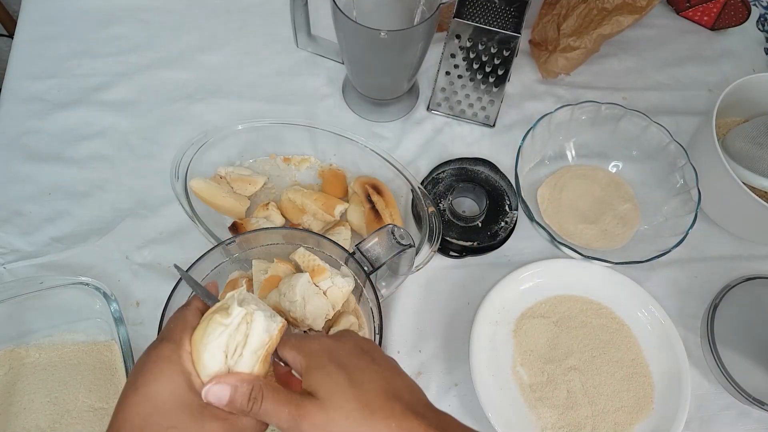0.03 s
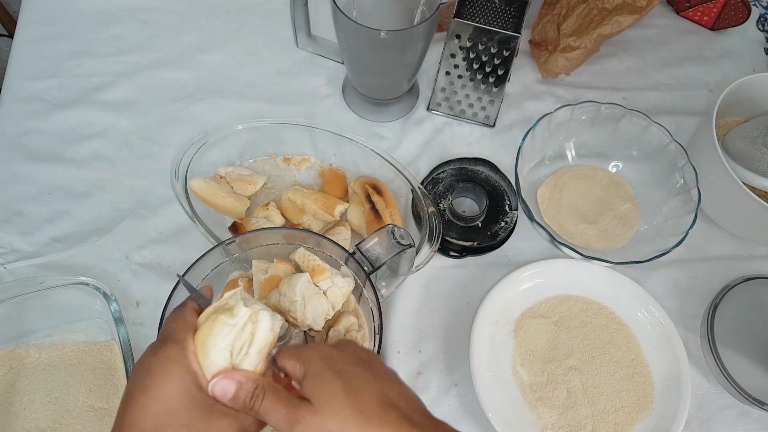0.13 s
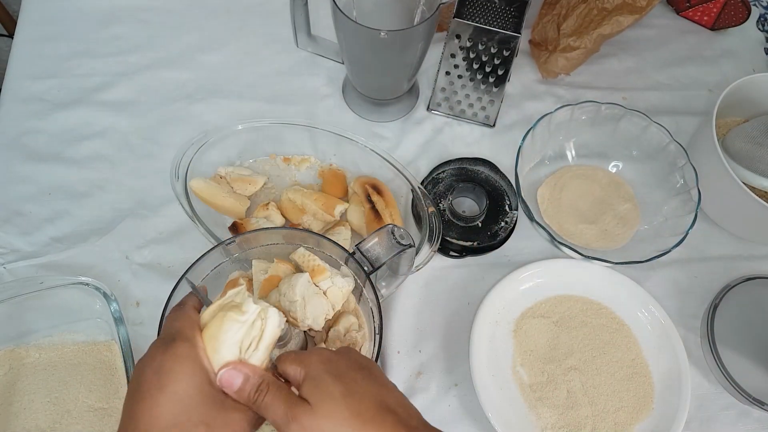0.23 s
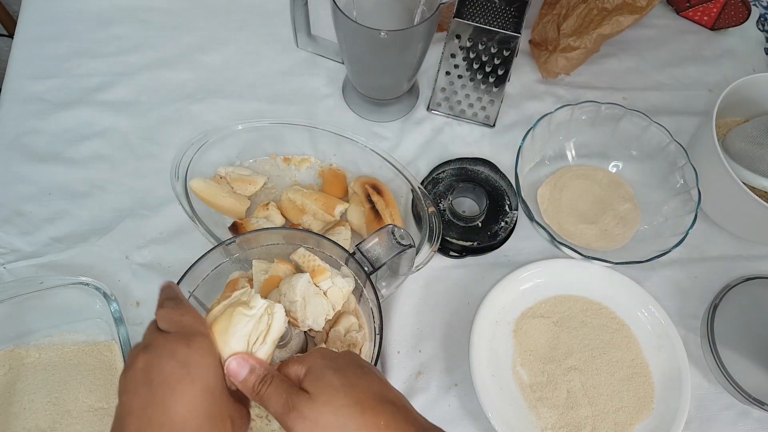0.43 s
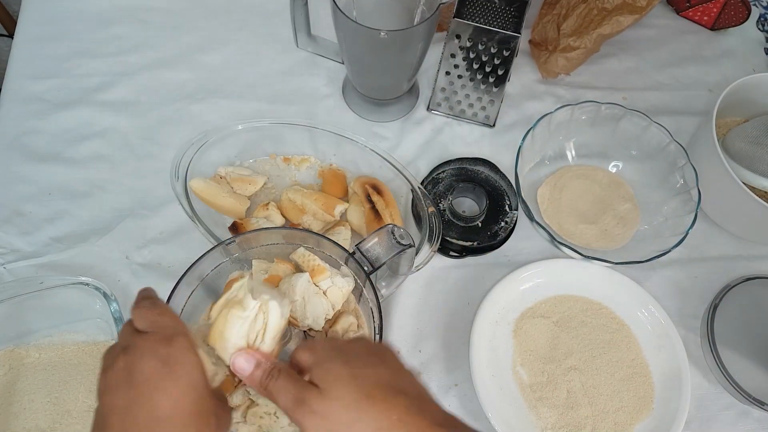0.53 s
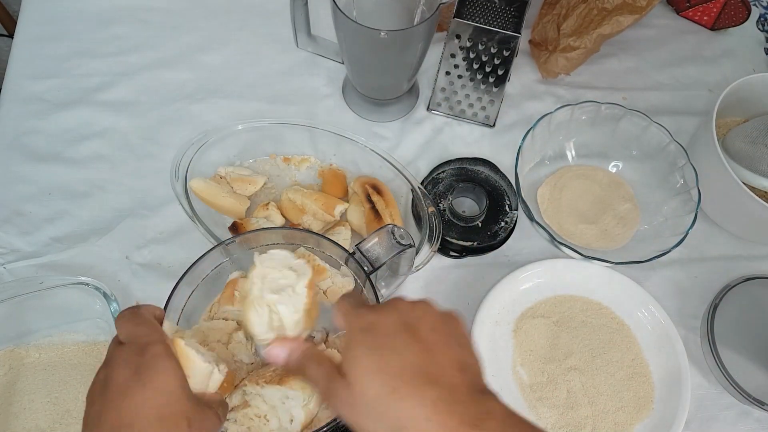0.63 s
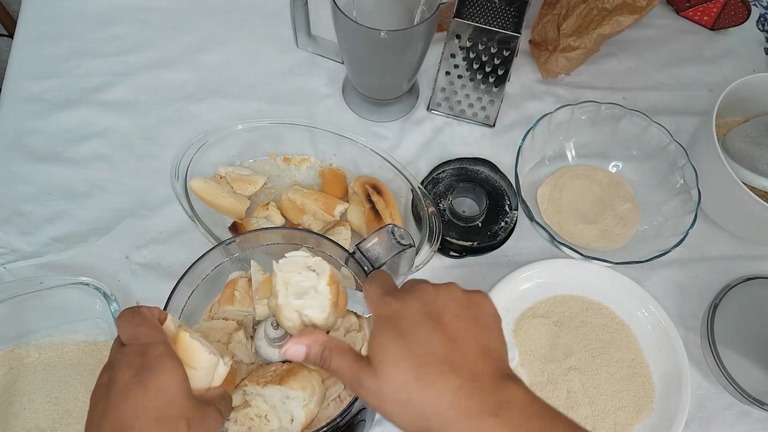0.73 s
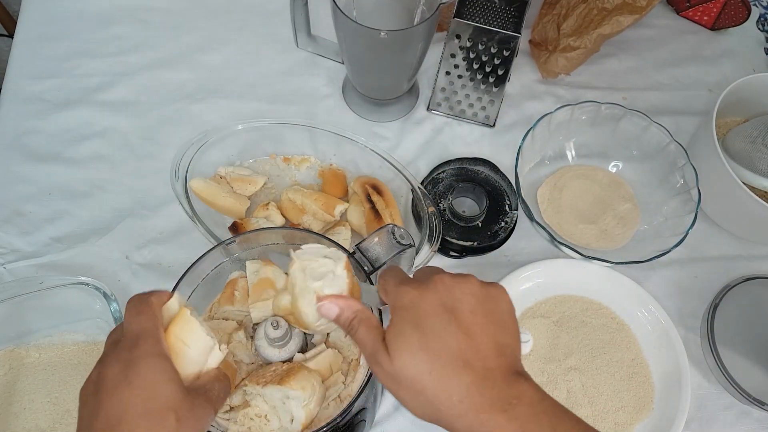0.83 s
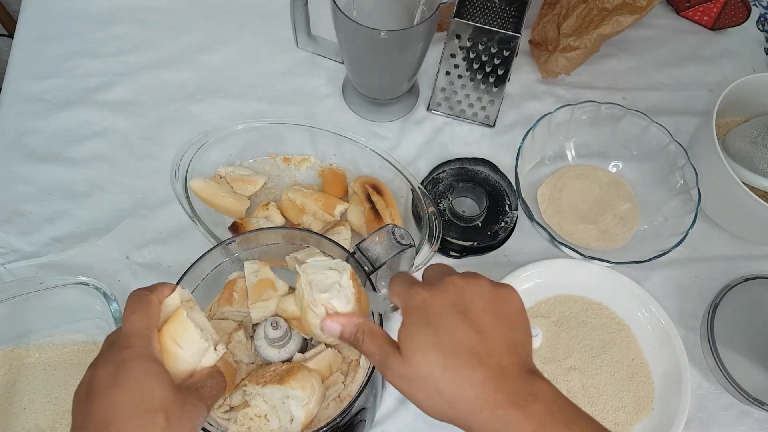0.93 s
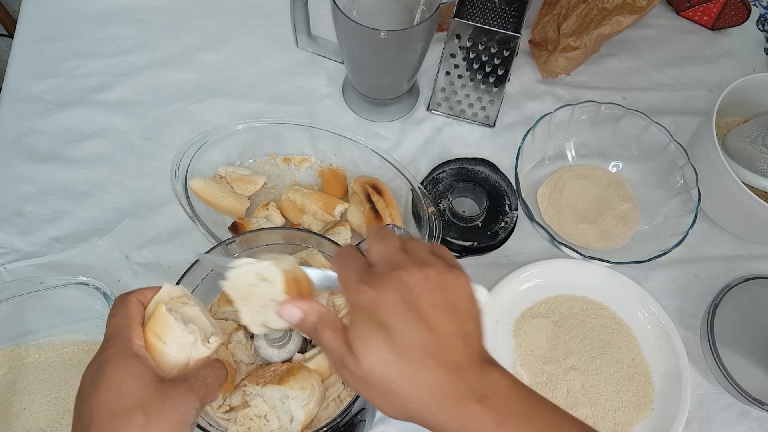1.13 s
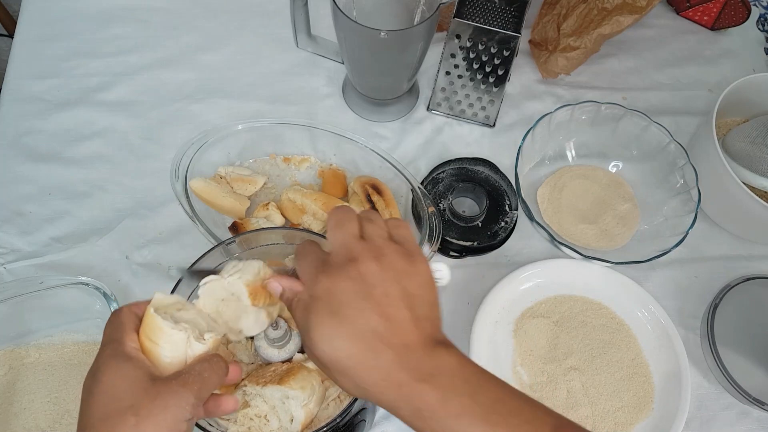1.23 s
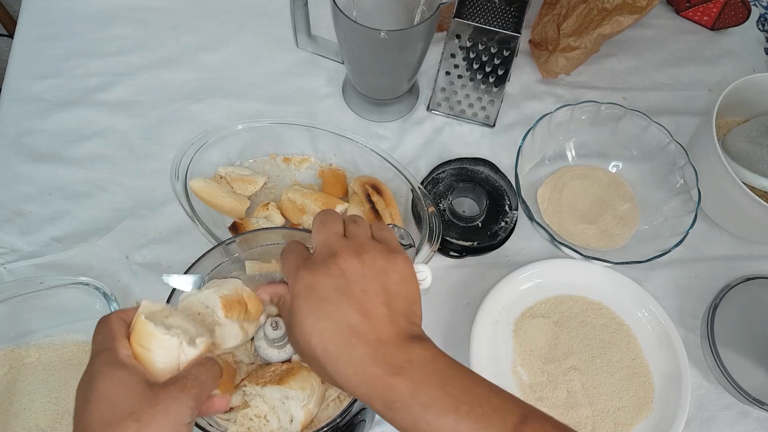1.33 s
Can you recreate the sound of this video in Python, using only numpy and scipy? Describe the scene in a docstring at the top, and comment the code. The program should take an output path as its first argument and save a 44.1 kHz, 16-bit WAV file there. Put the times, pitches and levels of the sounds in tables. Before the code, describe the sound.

Close up in a kitchen with a faint hum, bread crust crunches and snaps as it is cut and broken by hand. It parts with a hollow knock, then the pieces rustle softly and bump a plastic bowl.

```python
"""Breaking a crusty roll

A bread roll is cut and snapped in two by hand over a plastic bowl, close up in a small kitchen.
The crust crackles under the blade, gives way in sharp snaps that shed flakes, and parts with a hollow
knock. Hands rub the crumb, shift the pieces and bump the bowl, over room air and a faint hum."""
import sys
import numpy as np
from scipy import signal
from scipy.fft import rfft, irfft
from scipy.io import wavfile

SR = 44100
rng = np.random.default_rng(int(sys.argv[2]) if len(sys.argv) > 2 else 0)


def materialize(psi):
    """Save the field psi as 16-bit PCM at rate SR to the path in sys.argv[1].

    A 1-D psi becomes a single channel; in a 2-D psi each row is a channel.
    """
    bounded = np.clip(np.atleast_2d(psi).T, -1, 1)
    quanta = np.round(bounded * 32767).astype(np.int16)
    wavfile.write(sys.argv[1], SR, quanta)


N = 61739
BODY_HZ, BODY_OCTAVES, TREBLE_HZ = 1010, 0.68, 6000  # tone controls: mid bell and treble shelf


def undb(db):
    """Decibels to gain."""
    return 10 ** (np.asarray(db) / 20)


def level(x, db):
    """Scale to an rms level."""
    return x * undb(db) / np.sqrt(np.mean(x ** 2) + 1e-24)


def pulse_height(db):
    """Height of a one-sample pulse with this level over a millisecond."""
    return undb(db) * np.sqrt(SR / 1000)


def fade(t, t60):
    """Exponential decay, 60 dB down after t60 seconds."""
    return np.exp(-np.log(1000) * t / t60)


def ride(t, points):
    """A fader ride: gain gliding through (time, level) points."""
    return undb(np.interp(t, *np.array(points).T))


def through(x, response):
    """Filter a sound, keeping its length."""
    return signal.fftconvolve(x, response)[:len(x)]


def colour(points, body_db=0, treble_db=0, shelf_hz=TREBLE_HZ, size=2048):
    """Unit-energy response of an EQ curve with a mid bell and a high shelf."""
    hz = np.maximum(np.fft.rfftfreq(size, 1 / SR), 1)
    point_hz, point_db = np.array(points, float).T
    db = np.interp(np.log(hz), np.log(point_hz), point_db)
    db += treble_db / (1 + (shelf_hz / hz) ** 4)
    db += body_db * np.exp(-(np.log2(hz / BODY_HZ) / BODY_OCTAVES) ** 2)
    cepstrum = irfft(np.log(undb(db)))
    cepstrum[1:size // 2] *= 2  # minimum phase keeps the attack sharp
    cepstrum[size // 2 + 1:] = 0
    response = irfft(np.exp(rfft(cepstrum)))
    return response / np.linalg.norm(response)


def diffuse(size=N, alike_hz=450):
    """Noise from all around: alike left and right in the bass only."""
    mid, side = rfft(rng.standard_normal((2, size)))
    alike = .9 / (1 + (np.fft.rfftfreq(size, 1 / SR) / alike_hz) ** 2)
    pair = mid * np.sqrt(1 + alike) + np.array([[1], [-1]]) * side * np.sqrt(1 - alike)
    return irfft(pair, size) / np.sqrt(2)


def reflections(size, t60, db, delay_s):
    """A dense stereo tail that dies away."""
    t = np.arange(size) / SR
    tail = fade(t, t60) * (t > delay_s)
    return diffuse(size) * tail * undb(db) / np.linalg.norm(tail)


# Bright EQ of the close reflections (frequency [Hz], relative level [dB])
EARLY_EQ = [(60, -2), (300, -4.5), (1000, -6.5), (3000, -0.5), (7000, 2.5), (16000, 1)]


def place(x, size=4096, right_lag_s=.000062, pan_db=0.8):
    """Set a sound just left of centre; every spot on the bread has its own quick reflections."""
    lag = np.exp(-2j * np.pi * np.fft.rfftfreq(size, 1 / SR) * np.array([[0], [right_lag_s]]))
    pan = undb(np.array([[pan_db], [-pan_db]]) / 2)
    direct = irfft(lag) * pan * (np.arange(size) < size // 2)
    echo = reflections(size, t60=0.0025, db=-4.5, delay_s=0)  # hands and bowl rim
    echo += reflections(size, t60=0.072, db=-4.5, delay_s=0.0018)  # table and bowl
    tint = colour(EARLY_EQ)
    return np.array([signal.fftconvolve(x, d + through(e, tint))[:N] for d, e in zip(direct, echo)])


def add(out, start_s, x):
    """Place a sound in stereo and mix it in on cue."""
    i = int(start_s * SR)
    pair = place(x)[:, :N - i]
    out[:, i:i + pair.shape[1]] += pair


def grains(per_s=2000, spread_db=3):
    """Tiny clicks at random moments, mostly weak, a few strong."""
    heights = undb(spread_db * np.minimum(rng.exponential(size=N), np.pi)) * rng.choice([-1, 1], N)
    return level(heights * (rng.random(N) < per_s / SR), 0)


def smear(x, low_hz=2040, high_hz=13000, stages=4):
    """Travel through uneven crust spreads a click over a fraction of a millisecond."""
    for share in (np.arange(stages) + rng.random(stages)) / stages:
        hz = low_hz * (high_hz / low_hz) ** share
        feedback = signal.iirpeak(hz, Q=1, fs=SR)[1]
        x = signal.lfilter(feedback[::-1], feedback, x)  # all-pass
    return x


# Bass-heavy EQ of the room air (frequency [Hz], relative level [dB])
AIR_EQ = [(20, -27.5), (35, -14.5), (55, -4.5), (80, -10.5), (115, -3), (160, -6.5), (260, -5.5),
          (450, -18.5), (900, -19.5), (2500, -27.5), (7000, -39), (16000, -34)]
# Steady appliance tones (frequency [Hz], rms level [dB])
APPLIANCE_TONES = [(236, -74.5), (269, -69.5)]
# Swells of the low hum (time [s], rms level [dB])
HUM_RIDE = [(0, -60), (.1, -67), (.16, -80), (.24, -61), (.36, -63), (.44, -75), (.55, -60), (.66, -61.5),
            (.73, -70), (.81, -61.5), (.92, -61.5), (1.0, -69), (1.15, -63), (1.29, -72.5), (1.38, -65)]


def room_tone(t, air_db=-60, hum_hz=57.5):
    """The bed: room air, faint appliance tones and a low hum that swells and dips."""
    air = level(np.array([through(x, colour(AIR_EQ)) for x in diffuse()]), air_db)
    hum = np.sqrt(2) * np.sin(2 * np.pi * hum_hz * t) * ride(t, HUM_RIDE)
    tones = sum(level(np.sin(2 * np.pi * (hz * t + rng.random())), db) for hz, db in APPLIANCE_TONES)
    return air + hum + tones


# Dull EQ of the bowl, for rubs and bumps (frequency [Hz], relative level [dB])
BOWL_EQ = [(40, -28), (150, -12.5), (270, 2.5), (400, -3.5), (600, -7.5), (1000, -17), (1600, -24),
           (2500, -30.5), (4500, -51), (16000, -69)]
# Pressure of the rubbing hands (time [s], rms level [dB])
RUB_RIDE = [(0, -60.5), (.09, -58), (.15, -63.5), (.42, -58.5), (.5, -61), (.63, -69), (.70, -55.5),
            (.76, -70), (.82, -62.5), (.93, -60), (1.0, -55.5), (1.1, -72), (1.31, -76), (1.36, -58)]


def crumb_rub(t):
    """Hands rub the soft crumb: a low, grainy friction."""
    return place(through(grains() * ride(t, RUB_RIDE), colour(BOWL_EQ)))


# Crisp EQ of the crust (frequency [Hz], relative level [dB])
CRUST_EQ = [(40, -31.5), (130, -19.5), (330, -11.5), (570, -11), (830, -4), (1200, -2.5), (1900, -4.5),
            (2400, 1), (3250, 0.5), (4000, -5), (5200, -7.5), (7400, -13.5), (9500, -5.5), (12500, -10.5),
            (16000, -15.5)]
# Squeezes on the crust (time [s], rms level before the treble gain [dB], treble gain [dB])
STRAIN_RIDE = [(0, -53.5, -2.5), (.05, -66, 7), (.09, -50, -3), (.14, -51, -2), (.18, -51.5, 5.5),
               (.21, -41.5, -1.5), (.27, -42, -2), (.33, -43, -9), (.40, -56, 7), (.52, -58.5, 11.5),
               (.59, -65, 12.5), (.66, -61.5, -2.5), (.77, -73, 5), (.81, -77, -5), (0.858, -70, 9.5),
               (0.899, -61.5, 6), (1.05, -63, -0.5), (1.09, -89.5, -6.5), (1.31, -84.5, 6.5),
               (1.371, -56.5, 5)]


def crust_strain(t):
    """The crust crackles finely and continuously under fingers and blade."""
    times, db, treble_db = np.array(STRAIN_RIDE).T
    cracks = grains() * undb(np.interp(t, times, db))
    crunch = smear(through(cracks, colour(CRUST_EQ)))
    treble = signal.sosfilt(signal.butter(1, TREBLE_HZ, "high", fs=SR, output="sos"), crunch)
    treble_gain = undb(np.interp(t, times, treble_db))
    return place(crunch + treble * (treble_gain - 1))


def crust_patch(push, body_db, treble_db, detune_octaves=0.036):
    """Sound a push through one patch of crust; each patch differs a little in pitch."""
    pitch = 2 ** (detune_octaves * rng.uniform(-0.88, 1))
    response = colour(np.array(CRUST_EQ) * [pitch, 1], body_db, treble_db)
    return smear(signal.fftconvolve(push, response))


# Crackle cues (time [s], length [s], rms level [dB], body [dB], treble [dB])
CRACKLE_CUES = [(0.053, 0.0066, -42, 1, -3), (0.076, 0.011, -40, 4.5, -1), (.189, 0.0067, -38.5, 5, 2.5),
                (0.219, 0.0052, -33.5, -15, 6), (0.228, 0.0075, -27.5, 7.5, -15),
                (.237, 0.012, -33, -2, -10), (0.3471, 0.0045, -26, 4.5, 0), (0.554, 0.011, -45, -18, 9),
                (0.569, 0.026, -54.5, -20, -1.5), (0.79, 0.0084, -44.5, -1, 8), (0.955, 0.017, -53, 4, -1),
                (0.968, 0.014, -48.5, 2.5, 7), (1.335, 0.017, -53, -4, 6.5)]


def crust_crackles():
    """Short runs of cracks as a split travels through the crust."""
    out = np.zeros((2, N))
    for start_s, length_s, db, body_db, treble_db in CRACKLE_CUES:
        n = int(length_s * SR)
        run = level(grains()[:n] * signal.windows.tukey(n, .5), db)
        add(out, start_s, crust_patch(run, body_db, treble_db))
    return out


# Single fractures (time [s], level over 1 ms [dB], body [dB], treble [dB])
SNAP_CUES = [(0.0569, -41.5, -9.5, -8), (0.0963, -39, 10, 4), (.1279, -40.5, 12.5, -2.5),
             (.1587, -40, 7, 3.5), (0.1935, -38, -12, 1), (0.2163, -20.5, -3, -7.5), (0.2201, -20, 5.5, 0),
             (0.2262, -21.5, -2.5, 1.5), (.2328, -23, 6, 10), (.2342, -30, 10.5, 4.5),
             (.2420, -24, -2.5, -8.5), (0.2962, -20, 0, 3.5), (.3495, -21.5, -1, -22.5),
             (.3500, -19, -39, -4.5), (0.3518, -20.5, -1, -1.5), (.3522, -25.5, 4, -6),
             (0.3525, -22.5, 6.5, 16), (0.361, -26, 2.5, 13), (0.5376, -38.5, -6.5, 7),
             (.5580, -37, -21, 10), (0.7959, -42.5, 5, 3.5), (.8883, -50, 5, 1), (0.9773, -47.5, -6, 4),
             (.9830, -41.5, 3.5, 3), (1.054, -48.5, -4, 6.5), (1.2782, -57.5, -8, 10.5),
             (1.3330, -42.5, -9, 7.5)]


def crust_snaps(t, flake_db=-7.5, flake_t60_s=0.011):
    """Each fracture is one pulse into the damped crust, trailed by a spray of flakes."""
    out = np.zeros((2, N))
    for start_s, db, body_db, treble_db in SNAP_CUES:
        spray = (grains() * fade(t, flake_t60_s))[:SR // 20]
        push = spray * undb(flake_db) / (np.linalg.norm(spray) + 1e-9)
        push[0] += 1  # the fracture itself
        add(out, start_s, pulse_height(db) * crust_patch(push, body_db, treble_db))
    return out


# Modes of the knock (frequency [Hz], relative level [dB], t60 [s])
KNOCK_RING = [(126, -14, 0.088), (825, -3, .03), (1120, 0.5, 0.037), (1386, 6.5, 0.031), (2380, 1, 0.029),
              (2900, -11.5, 0.016), (3304, -2, 0.037), (4770, 1, 0.022)]


def blade_knock(t, start_s=.3516, hit_db=-19):
    """A short hollow ring as the roll parts and the blade knocks through."""
    out = np.zeros((2, N))
    ring = sum((-1) ** k * undb(db) * np.sin(2 * np.pi * hz * t) * fade(t, t60)
               for k, (hz, db, t60) in enumerate(KNOCK_RING))
    add(out, start_s, pulse_height(hit_db) * ring / np.linalg.norm(ring))
    return out


# Hits on the bowl (time [s], level over 1 ms [dB], brightness [dB])
BUMP_CUES = [(.352, -37.5, -3.5), (0.674, -45, -3), (0.701, -43.5, 3), (.795, -45, -16),
             (.804, -39.5, -5.5), (.822, -59, -14), (.893, -73, -7), (0.97, -40.5, -13),
             (0.999, -41.5, -13), (1.344, -38, 0), (1.353, -39.5, 7), (1.373, -43.5, 12), (1.3839, -34, 14)]


def bowl_bumps():
    """Bread and hands bump the plastic bowl, each pulse a dull thud."""
    out = np.zeros((2, N))
    for start_s, db, bright_db in BUMP_CUES:
        add(out, start_s, pulse_height(db) * colour(BOWL_EQ, treble_db=bright_db, shelf_hz=691))
    return out


# EQ of the reverb send (frequency [Hz], relative level [dB])
WALL_EQ = [(60, -6), (300, 5), (1000, 0), (3000, 0), (7000, 3.5), (16000, -2.5)]


def kitchen(x):
    """The walls add a short, soft tail."""
    send = through(x[0], colour(WALL_EQ))
    tails = reflections(32768, t60=0.38, db=-7.5, delay_s=0.0062)
    return x + np.array([through(send, tail) for tail in tails])


def scene():
    """The mix: bread and bowl in the kitchen, over the room tone."""
    t = np.arange(N) / SR
    foley = (crumb_rub(t), crust_strain(t), crust_crackles(), crust_snaps(t), blade_knock(t), bowl_bumps())
    return room_tone(t) + sum(kitchen(layer) for layer in foley)


def record(dry, top_hz=15850):
    """A steep low-pass trims the very top."""
    return signal.sosfilt(signal.ellip(10, .2, 80, top_hz, fs=SR, output="sos"), dry)


dry = scene()
out = record(dry)
materialize(out)
```